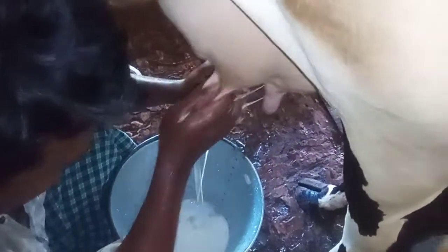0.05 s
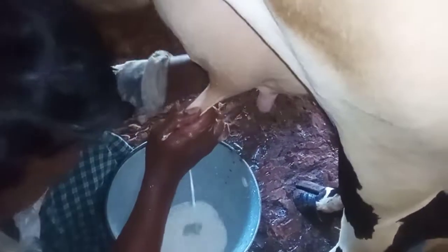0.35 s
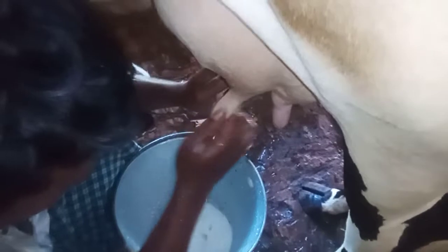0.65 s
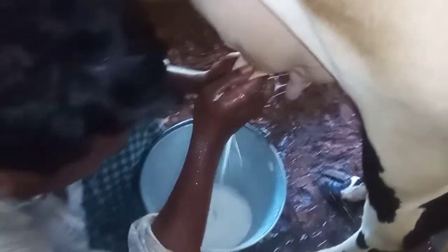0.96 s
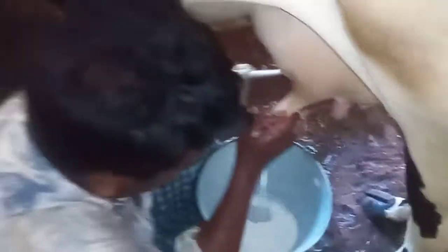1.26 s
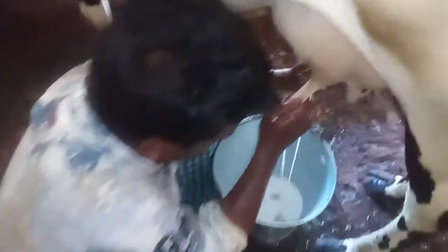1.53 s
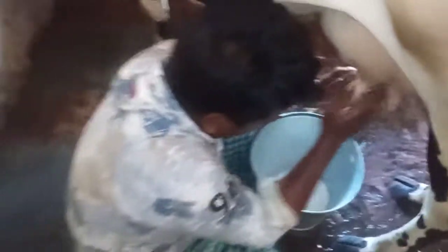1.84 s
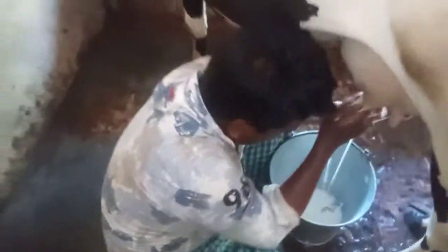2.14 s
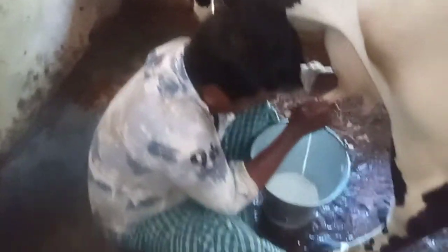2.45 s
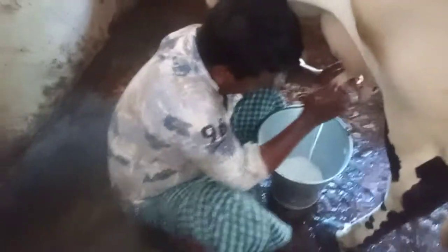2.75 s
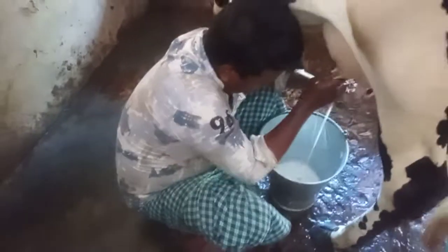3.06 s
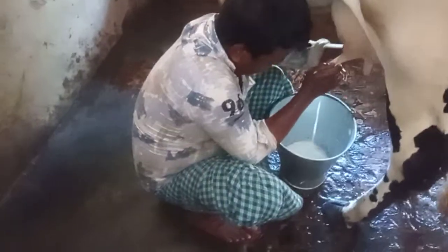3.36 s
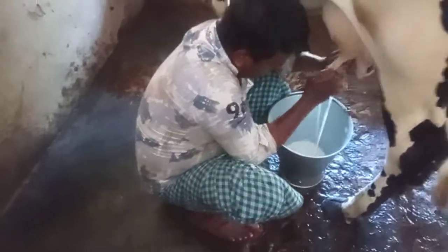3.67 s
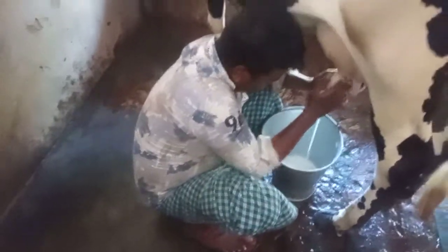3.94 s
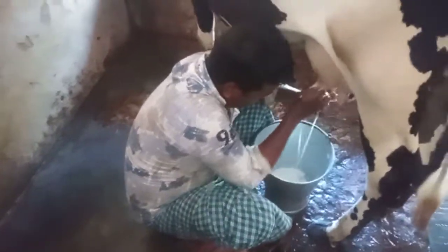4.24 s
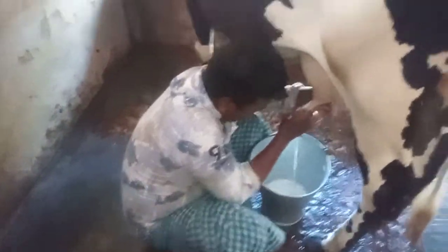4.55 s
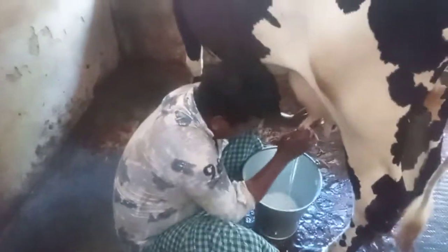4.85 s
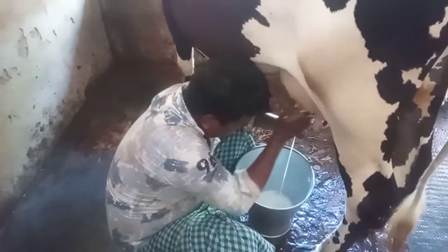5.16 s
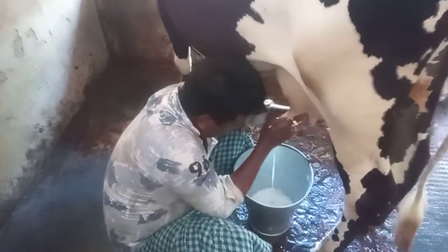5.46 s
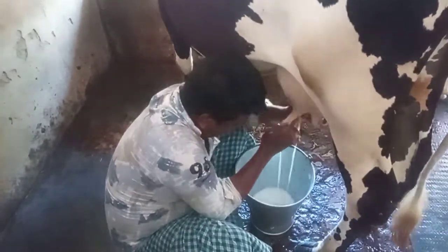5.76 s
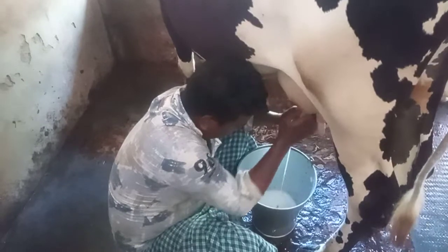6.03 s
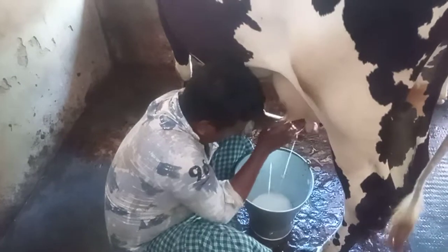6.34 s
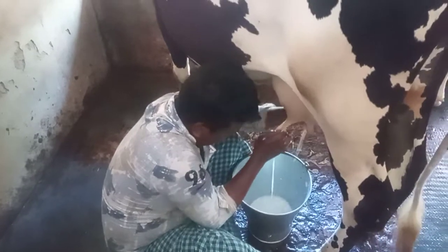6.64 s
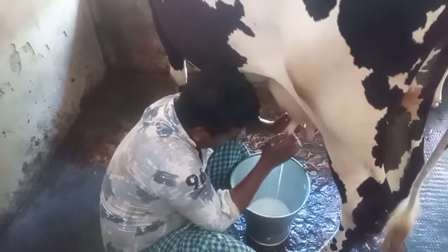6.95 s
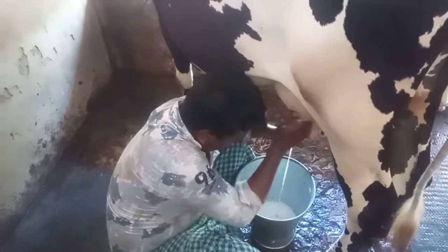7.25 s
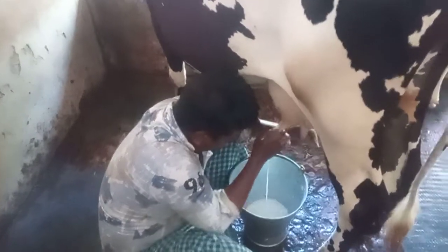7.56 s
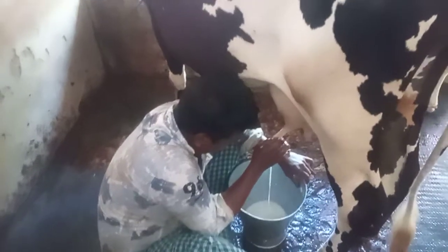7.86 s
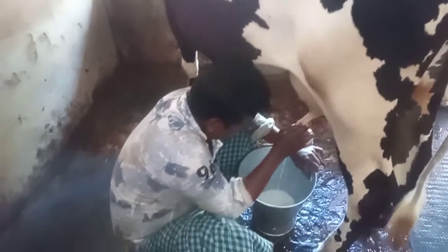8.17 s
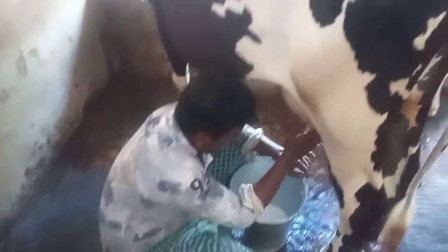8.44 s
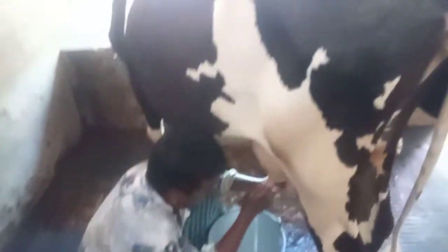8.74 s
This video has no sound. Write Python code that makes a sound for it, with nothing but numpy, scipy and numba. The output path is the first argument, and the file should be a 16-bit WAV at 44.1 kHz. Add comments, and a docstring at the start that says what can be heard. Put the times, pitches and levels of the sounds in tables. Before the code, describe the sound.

From the start, quick jets of milk squirt into a part-filled steel bucket as a cow is milked by hand, heard close in an open stall. The jets overlap, about five or six a second, each a bright, bubbly hiss with a fine spatter on the froth and a slight metallic ring. Gurgles and sharp little spurts run through them. From about 2 seconds, deeper plunges slop the milk and drum softly on the bucket, strongest around 3, 5.5 and 6.5 to 8 seconds. At about 8 seconds the jets stop and the milk settles, with a few faint spatters. Between 8.3 and 8.8 seconds come four short, thin, wavering whistles, perhaps a bird, the last possibly a fine jet of milk, with a soft knock at about 8.4 seconds. Faint yard noise and occasional dull bumps lie behind throughout.

```python
"""Jets of milk hiss and ring into a steel bucket: a cow is milked by hand in an open stall.
Two overlapping jets blow clouds of ringing bubbles, spatter on the froth and drag air under it.
Deep plunges slop the milk and drum on the bucket; its bare wall rings along.
Faint yard noise and dull bumps lie behind. When the hands pause, thin whistles waver:
perhaps a bird, the last likely a thin milk jet singing."""
import sys
import numpy as np
from scipy import signal
from scipy.fft import rfft, irfft
from scipy.io import wavfile
from scipy.ndimage import uniform_filter1d
from numba import njit

SR = 44100
rng = np.random.default_rng(int(sys.argv[2]) if len(sys.argv) > 2 else 0)


def persist_wave(psi):
    """Save psi, clipped to +-1, as 16-bit WAV."""
    counts = np.round(np.clip(psi, -1, 1) * 32767).astype(np.int16)
    wavfile.write(sys.argv[1], SR, np.atleast_2d(counts).T)


N = 388080
T = np.arange(N) / SR
T_SLOW = T[::64]  # envelope clock

# Table levels are relative within a layer.
# jet enters open milk: t/s, attack/s, hold/s, level/dB, mid-glide f/Hz, log-pitch scatter
SQUIRT_EVENTS = [(-0.042, 0.05, 0.14, -14.5, 2990, 0.08), (0.208, 0.081, 0.082, -16.5, 3400, 0.04),
                 (0.383, 0.041, 0.18, -20.5, 3410, 0.11), (0.6, 0.057, 0.15, -19.5, 3270, 0.13),
                 (0.788, 0.039, 0.051, -22, 3580.0, 0.041), (0.87, 0.068, 0.1, -20.5, 3460, 0.06),
                 (1.07, 0.089, 0.15, -19, 3420, 0.23), (1.267, 0.069, 0.12, -16.0, 3020, 0.093),
                 (1.439, 0.078, 0.095, -19.5, 3120, 0.086), (1.585, 0.092, 0.13, -19.0, 2950.0, 0.06),
                 (1.833, 0.085, 0.13, -22, 3020, 0.06), (1.952, 0.033, 0.092, -17.5, 2900, 0.04),
                 (2.09, 0.032, 0.051, -18.5, 3010, 0.05), (2.18, 0.038, 0.076, -23, 3020, 0.07),
                 (2.271, 0.018, 0.14, -19.5, 3140, 0.08), (2.47, 0.024, 0.18, -26, 3470, 0.06),
                 (2.674, 0.12, 0.045, -16, 3050, 0.12), (2.854, 0.033, 0.14, -21.5, 2980, 0.13),
                 (2.97, 0.072, 0.1, -21.5, 3410, 0.1), (3.118, 0.034, 0.108, -26, 3220, 0.08),
                 (3.218, 0.043, 0.058, -17.5, 2880, 0.12), (3.335, 0.027, 0.23, -23, 3470, 0.04),
                 (3.61, 0.048, 0.1, -24.0, 3250, 0.08), (3.722, 0.051, 0.027, -18.5, 3370, 0.09),
                 (3.834, 0.019, 0.25, -23, 2960, 0.2), (4.142, 0.039, 0.067, -19.5, 2810, 0.14),
                 (4.238, 0.029, 0.15, -28.5, 2730, 0.01), (4.345, 0.03, 0.071, -18.5, 2780, 0.06),
                 (4.486, 0.051, 0.14, -18.5, 2900, 0.086), (4.67, 0.021, 0.1, -24, 2990, 0.08),
                 (4.795, 0.1, 0.1, -18, 2900, 0.21), (4.985, 0.05, 0.018, -15, 2840.0, 0),
                 (5.083, 0.047, 0.11, -21, 2760, 0.12), (5.324, 0.093, 0.01, -17, 2680, 0.12),
                 (5.454, 0.052, 0.16, -19.0, 2950, 0.1), (5.688, 0.04, 0.072, -27, 3270, 0.14),
                 (5.827, 0.103, 0.12, -21.0, 2880, 0.09), (5.965, 0.048, 0.19, -21, 3070, 0.2),
                 (6.118, 0.11, 0.09, -18.0, 2840, 0.08), (6.324, 0.034, 0.11, -21.5, 2700, 0.052),
                 (6.847, 0.13, 0.017, -17.5, 3210, 0.15), (7.01, 0.024, 0.08, -22.5, 2910, 0.13),
                 (7.103, 0.064, 0.047, -17, 2860, 0.06), (7.242, 0.029, 0.18, -23.5, 3150, 0.12),
                 (7.475, 0.03, 0.13, -28.5, 2750, 0.1), (7.717, 0.055, 0.108, -22.0, 2770, 0.12),
                 (7.84, 0.068, 0.1, -24, 2830, 0.047)]
# jet strikes froth: t/s, attack/s, hold/s, spray level/dB, mist level/dB
SPATTER_EVENTS = [(-0.038, 0.032, 0.26, -32.5, -40), (0.253, 0.076, 0.15, -31, -42),
                  (0.442, 0.1, 0.147, -31.5, -41.5), (0.707, 0.043, 0.18, -33.5, -41.5),
                  (0.868, 0.091, 0.159, -32, -37.5), (1.047, 0.13, 0.098, -28, -37),
                  (1.243, 0.03, 0.19, -30.5, -42), (1.422, 0.066, 0.12, -33.5, -42.5),
                  (1.577, 0.074, 0.26, -32.0, -40), (1.815, 0.051, 0.238, -35.5, -40),
                  (2.11, 0.084, 0.075, -34, -41), (2.25, 0.097, 0.055, -28.5, -40),
                  (2.42, 0.044, 0.3, -30, -44), (2.763, 0.042, 0.16, -31.5, -46),
                  (2.968, 0.078, 0.18, -29.5, -45.5), (3.217, 0.1, 0.074, -28, -43.0),
                  (3.377, 0.021, 0.16, -26.5, -47.0), (3.58, 0.055, 0.17, -28, -42.5),
                  (3.766, 0.063, 0.2, -28.5, -41), (4.01, 0.06, 0.25, -31, -40.5),
                  (4.32, 0.018, 0.08, -32.0, -49.0), (4.401, 0.061, 0.11, -29, -44),
                  (4.547, 0.033, 0.214, -32.5, -51), (4.778, 0.057, 0.17, -27, -40),
                  (5.067, 0.042, 0.186, -30.0, -44.0), (5.286, 0.043, 0.143, -30, -43),
                  (5.416, 0.029, 0.23, -30.5, -46), (5.677, 0.084, 0.218, -29, -41),
                  (5.925, 0.041, 0.16, -31.5, -41), (6.108, 0.076, 0.28, -29.0, -40),
                  (6.401, 0.078, 0.055, -25.5, -40.0), (6.57, 0.048, 0.16, -26.5, -39.5),
                  (6.771, 0.1, 0.24, -27.5, -40.0), (7.046, 0.03, 0.22, -35.5, -48),
                  (7.207, 0.077, 0.31, -30.5, -40), (7.484, 0.092, 0.13, -27, -39),
                  (7.717, 0.059, 0.22, -31.5, -42.5), (8.064, 0.012, 0.22, -52.5, -62.5),
                  (8.433, 0.01, 0.034, -42.5, -77.5), (8.532, 0.024, 0.15, -55, -60),
                  (8.788, 0.003, 0.1, -36.5, -52)]
# jet drags air under: t/s, length/s, level/dB
GURGLE_EVENTS = [(-0.021, 0.246, -32), (0.433, 0.187, -31), (0.684, 0.033, -30), (1.067, 0.161, -26.5),
                 (1.215, 0.031, -18.5), (1.449, 0.064, -26), (1.633, 0.2, -29), (2.294, 0.16, -27),
                 (2.462, 0.048, -32), (2.7, 0.11, -32), (3.285, 0.158, -31.5), (4.318, 0.21, -32.5),
                 (4.477, 0.15, -30.5), (4.757, 0.13, -33.5), (5.308, 0.14, -33), (5.544, 0.062, -29.5),
                 (5.85, 0.049, -30.5), (6.134, 0.065, -37), (6.38, 0.11, -28), (7.02, 0.082, -32),
                 (7.5, 0.052, -24.5), (7.638, 0.33, -33)]
# jet plunges deep: t/s, length/s, drum level/dB, slop level/dB
PLUNGE_EVENTS = [(0.162, 0.033, -55, -44), (0.478, 0.11, -44.5, -42), (0.707, 0.044, -44, -37.5),
                 (0.976, 0.165, -43, -40.5), (1.106, 0.15, -39, -53), (1.403, 0.15, -52, -38.5),
                 (1.7, 0.091, -41.5, -39.5), (1.882, 0.03, -39.5, -42), (2.076, 0.2, -39.0, -43),
                 (2.337, 0.22, -39.5, -32.5), (2.505, 0.054, -30, -33), (2.822, 0.11, -42.5, -35),
                 (3.094, 0.12, -30, -42), (3.233, 0.101, -38, -34), (3.39, 0.091, -31.5, -30.5),
                 (3.564, 0.029, -33.5, -34), (3.937, 0.19, -44.5, -44.5), (4.083, 0.21, -42.5, -44.5),
                 (4.43, 0.024, -39, -35.5), (4.599, 0.17, -38, -34.5), (4.897, 0.086, -40, -39.5),
                 (5.184, 0.038, -38, -35), (5.255, 0.095, -29, -33), (5.66, 0.26, -30.5, -34),
                 (6.065, 0.43, -42, -44), (6.448, 0.285, -26.5, -33), (6.807, 0.048, -30, -34.0),
                 (7.017, 0.025, -28, -38), (7.239, 0.26, -34.5, -38), (7.575, 0.37, -26.0, -38.5),
                 (7.996, 0.18, -29, -41.5)]
# jet stabs the milk: t/s, peak level/dB, f/Hz
SPURT_EVENTS = [(0.2747, -4.5, 3570), (0.2834, -8, 3590), (0.2904, -7, 3320), (0.3166, -6, 3560),
                (1.971, -11, 2840), (1.982, -17, 2980), (2.0298, -5, 2980), (2.126, -10, 2920),
                (2.132, -2.5, 2960), (2.292, -8, 3030), (2.301, -3.5, 3110), (2.7377, -5, 3060),
                (2.788, -6, 2900), (3.259, -7, 3100), (3.7875, -6, 3420), (4.1688, -10, 2670),
                (4.3659, -7, 2840), (4.3966, -4, 2650), (4.476, -6.5, 2750), (4.682, -5.5, 2785),
                (4.866, -6.5, 2850), (4.9565, -7, 2780), (5.0453, -5, 2840), (5.514, -3.5, 2880),
                (5.534, -8, 2880), (5.9772, -11, 2700), (6.4114, -9, 2680), (7.157, -8, 2850),
                (7.1783, -4, 2910), (7.9083, -13, 2830)]
# jet digs a hollow: centre t/s, length/s, f/Hz, level/dB
GULP_EVENTS = [(0.44, 0.4, 2220, -29), (0.55, .043, 1540, -29.5), (0.755, 0.17, 2280, -28.5),
               (0.837, .05, 3450, -26), (.97, .09, 3490, -26), (1.273, 0.025, 1330, -20),
               (1.74, 0.065, 3030, -25), (2.412, 0.066, 1020, -31), (2.475, 0.081, 3800, -25),
               (2.542, 0.29, 4300, -27.5), (2.7, 0.12, 3060, -27), (2.905, .025, 2750, -23),
               (3.04, 0.037, 2690, -22), (3.126, .08, 3670, -23.5), (4.732, 0.054, 3050, -25),
               (4.83, 0.055, 1170, -32), (5.748, 0.043, 3340, -26)]
# bumps and shuffles: centre t/s, length/s, f/Hz, level/dB
BUMP_EVENTS = [(.55, .1, 150, -54), (1.145, 0.17, 170, -58), (1.36, 0.083, 115, -50),
               (1.53, .12, 86.5, -56), (1.54, 0.16, 170, -47.5), (1.813, .04, 151, -47),
               (1.83, .04, 75, -51), (6.16, 0.055, 130, -62), (8.094, 0.24, 140, -56),
               (8.444, 0.054, 760, -37.5), (8.45, 0.092, 1160, -40), (8.736, 0.11, 85, -59)]
# thin whistles: t/s, length/s, first f/Hz, last f/Hz, level/dB, octave level/dB
WHISTLE_NOTES = [(8.3, 0.046, 3520, 3500, -46, -25), (8.345, 0.13, 2970, 2480, -32, -9),
                 (8.53, .055, 3480, 3450, -42, -25), (8.605, 0.14, 2625, 2810, -37.5, -27)]
# modes of the part-filled bucket: f/Hz, width/Hz, level/dB
BUCKET_MODES = [(280.8, 6.6, 2.5), (320, 17.2, 0.5), (352.3, 29.3, 2), (376, 12.8, 3.5), (408.8, 5.6, 1),
                (431.7, 10.5, 1), (500.4, 7.2, -7), (574, 13, -9), (599, 19, -10.5), (703, 23, -15.5),
                (799, 21, -21), (960, 26, -22.5)]
# modes of the bare wall above the milk: f/Hz, width/Hz, level/dB
WALL_MODES = [(930, 12, -5), (1275, 16, -6), (1570, 10, -18.5), (2130, 13, -39), (2450, 25, -8),
              (2880, 59, -16.5), (3190, 42, -36), (3400, 21, -15), (3560, 62, -5), (4460, 87, -21),
              (4580, 28, -2.5), (5280, 30, -36), (6500, 37, -30)]
# EQ of drops on froth: f/Hz, level/dB
SPRAY_EQ = [(400, -40), (1000, -18), (1900, -10.5), (2200, 3), (3000, 2.5), (4200, 3.5), (5000, 2),
            (6700, 1), (7400, -6.5), (8100, -18), (10500, -22.5), (14000, -40)]
# fine droplet hiss, with the microphone's resonance near 15 kHz: f/Hz, level/dB
MIST_MIC_EQ = [(6000, -35), (8200, -1.5), (10300, -2), (12000, -6.5), (13700, -4.5), (14700, 4.5),
               (15300, 10), (15800, -5)]
# EQ of slopping milk: f/Hz, level/dB
SLOP_EQ = [(60, -36), (150, -20), (230, -24), (300, 8.5), (480, 0), (530, 0), (590, 5.5), (760, 7.5),
           (835, -2), (950, 8), (1300, -1.5), (2500, -22)]
# EQ of yard noise: f/Hz, level/dB
YARD_EQ = [(25, -25), (70, -7.5), (130, -2), (330, 12), (600, -0.5), (1300, 3), (2700, 12), (4500, -4),
           (6500, 2), (8200, -35.5), (13000, -35), (15500, -32)]

PAUSE_S, SETTLE_S = 7.97, 0.14  # hands stop, milk settles


def undb(db):
    """dB to gain."""
    return 10 ** (np.asarray(db) / 20)


def colour(x, eq):
    """Filter by (f/Hz, level/dB) points, interpolated over log f."""
    hz, db = np.transpose(eq)
    bins_hz = np.maximum(np.fft.rfftfreq(N, 1 / SR), 1)
    return irfft(rfft(x) * undb(np.interp(np.log(bins_hz), np.log(hz), db)), N)


def resonate(x, modes):
    """Ring (f/Hz, width/Hz, level/dB) modes; neighbours in opposite polarity."""
    return sum((-1) ** k * undb(db) * signal.lfilter(*signal.iirpeak(hz, hz / width_hz, SR), x)
               for k, (hz, width_hz, db) in enumerate(modes))


def steady(x, samples=2200):
    """Hold running RMS at 1; quick grain stays."""
    power = uniform_filter1d(uniform_filter1d(x * x, samples), samples)
    return x / np.sqrt(np.abs(power) + 1e-18)


def drops(per_s, spread_db):
    """Random impacts; a few stand out by multiples of spread_db."""
    size = undb(spread_db * np.minimum(rng.exponential(size=N), 5))
    return (rng.random(N) < per_s / SR) * size * rng.choice([-1, 1], N)


def flutter(rate_hz):
    """Random wobble, unit deviation."""
    wobble = np.interp(T * rate_hz, np.arange(N), rng.standard_normal(N))
    return wobble / wobble.std()


def swell(centre_s, length_s):
    """Gaussian hump."""
    return np.exp(-2 * ((T - centre_s) / length_s) ** 2)


def envelope(start_s, length_s, attack_s, release_s, slope_db_per_s=0):
    """Linear attack, sloping hold, exponential release, on T_SLOW."""
    age_s = T_SLOW - start_s
    attack = np.clip(age_s / attack_s, 0, 1)
    hold = undb(slope_db_per_s * np.clip(age_s, 0, length_s))
    return attack * hold * np.exp(-np.maximum(age_s - length_s, 0) / release_s)


def overlap(shapes, db):
    """Power sum of envelopes, as an audio-rate gain."""
    return np.interp(T, T_SLOW, np.sqrt(undb(db) ** 2 @ np.square(shapes) + 1e-12))


def echoes(x, t60_s, wet_db, wander_hz, count=7):
    """Add dense reflections whose pattern shifts as the source wanders."""
    t = T[:SR // 6]
    tails = rng.standard_normal((count, len(t))) * np.exp(-np.log(1000) * t / t60_s)
    tails /= np.linalg.norm(tails, axis=1, keepdims=True)
    weights = np.array([np.exp(2 * flutter(wander_hz)) for _ in range(count)])
    weights /= np.linalg.norm(weights, axis=0)
    return x + undb(wet_db) * sum(w * signal.fftconvolve(x, tail)[:N] for w, tail in zip(weights, tails))


@njit
def bubbles(kicks, hz, cycles, rise):
    """Each kick rings a bubble: down 60 dB over `cycles`, pitch up by the fraction `rise`."""
    out = np.zeros(len(kicks))
    for i in np.nonzero(kicks)[0]:
        life, phase = cycles * SR / hz[i], 0.
        for j in range(min(int(life), len(kicks) - i)):
            phase += 2 * np.pi * hz[i] / SR * (1 + rise * j / life)
            out[i + j] += kicks[i] * np.exp(-6.9 * j / life) * np.sin(phase)
    return out


def fine_bubbles(centre_hz, scatter):
    """A still jet blows bubbles of one size, a spattering jet all sizes."""
    hz = centre_hz * np.exp(np.clip(scatter * rng.laplace(size=N), -0.7, 0.7))
    kicks = drops(per_s=3500, spread_db=2.5) * undb(0.82 * flutter(150))
    cloud = echoes(bubbles(kicks, hz, cycles=44.4, rise=0.018), t60_s=0.14, wet_db=0, wander_hz=5)
    eq = [(500, -41), (1900, -5.5), (2250, 2), (4200, 5.5), (7000, -17), (12000, -32)]
    return steady(colour(cloud, eq))


def squirts(rise_hz_per_s=180):
    """Jets ring the milk in turn: level sags, pitch creeps up, the loudest dominates bubble size."""
    start_s, attack_s, hold_s, db, mid_hz, scatter = np.transpose(SQUIRT_EVENTS)
    length_s = attack_s + hold_s
    shapes = np.array([envelope(*timing, release_s=0.044, slope_db_per_s=-19)
                       for timing in zip(start_s, length_s, attack_s)])
    glides_hz = [hz + rise_hz_per_s * (np.clip(T_SLOW - at_s, 0, span_s) - span_s / 2)
                 for at_s, span_s, hz in zip(start_s, length_s, mid_hz)]
    share = (undb(db)[:, None] * shapes) ** 2 + 1e-18
    share /= share.sum(axis=0)
    centre_hz = np.interp(T, T_SLOW, (share * glides_hz).sum(axis=0))
    cloud = fine_bubbles(centre_hz, np.interp(T, T_SLOW, scatter @ share))
    return overlap(shapes, db - 0.05) * undb(1.4 * flutter(30)) * cloud


def shower(hits, t60_s, wet_db):
    """Each impact throws up a dying shower of finer droplets."""
    pole = np.exp(-np.log(1e6) / (t60_s * SR))
    energy = signal.lfilter([1 - pole], [1, -pole], hits ** 2 + 1e-18)
    return hits + undb(wet_db) * np.sqrt(energy) * rng.standard_normal(N)


def spray(mist_gain):
    """Drops patter on the froth; the finest fizz on top."""
    hits = drops(per_s=2400, spread_db=2.5) * undb(flutter(110))
    patter = shower(hits, t60_s=0.28, wet_db=1)
    patter = echoes(patter, t60_s=0.06, wet_db=-4, wander_hz=6, count=12)
    fizz = shower(drops(per_s=1400, spread_db=2.5), t60_s=0.096, wet_db=6)
    fizz = echoes(fizz, t60_s=0.051, wet_db=-15, wander_hz=5, count=4)
    return undb(5) * steady(colour(patter, SPRAY_EQ)) + mist_gain * steady(colour(fizz, MIST_MIC_EQ))


def spatters(slugs_per_s=25, slug_decay_s=0.033, slug_db=2.14):
    """Spray and mist swell with each jet on the froth and jump with the slugs in it."""
    start_s, attack_s, hold_s, spray_db, mist_db = np.transpose(SPATTER_EVENTS)
    shapes = [envelope(*timing, release_s=0.07) for timing in zip(start_s, attack_s + hold_s, attack_s)]
    gain = overlap(shapes, spray_db - 0.98)
    mist_ratio = overlap(shapes, mist_db - 0.8) / gain
    arrivals = rng.random(N) < slugs_per_s / SR
    slugs = signal.lfilter([1], [1, -np.exp(-1 / (slug_decay_s * SR))], arrivals)
    jumps = undb(slug_db * (slugs - slugs.mean()))
    return gain * jumps * spray(mist_ratio * undb(0.45 * flutter(30)))


def agitation(events, db, attack_s, release_s, floor_db):
    """Gain of events (t/s, length/s, ...) over a floor of stirred milk that settles at the pause."""
    shapes = [envelope(start_s, length_s, attack_s, release_s) for start_s, length_s, *_ in events]
    stirred = np.exp(-np.maximum(T - PAUSE_S, 0) / SETTLE_S)
    return np.hypot(overlap(shapes, db), stirred * undb(floor_db))


def gurgles():
    """Air dragged under the froth rings as coarse bubbles."""
    *_, db = np.transpose(GURGLE_EVENTS)
    gain = agitation(GURGLE_EVENTS, db, attack_s=0.026, release_s=0.1, floor_db=-36)
    gain *= undb(-1.4 + 0.36 * flutter(25))
    hz = 1550 * np.exp(0.317 * np.clip(rng.standard_normal(N), -3, 3))
    cloud = bubbles(drops(per_s=2200, spread_db=3.5), hz, cycles=26.0, rise=0.065)
    cloud = echoes(cloud, t60_s=0.21, wet_db=-0.5, wander_hz=4)
    eq = [(300, -32), (800, -10), (1050, -3.5), (1450, 3), (2200, 11.5), (4000, -5)]
    return gain * steady(colour(cloud, eq))


def yard():
    """Faint, wavering outdoor noise."""
    return steady(colour(rng.standard_normal(N), YARD_EQ)) * undb(-44 + flutter(9))


def wall_ring(x):
    """The bare steel wall rings along with x, all modes in phase."""
    return sum(resonate(x, [mode]) for mode in WALL_MODES)


def bucket_drum():
    """Deep jets beat the low modes of the bucket."""
    *_, db, _ = np.transpose(PLUNGE_EVENTS)
    gain = agitation(PLUNGE_EVENTS, db, attack_s=0.019, release_s=0.097, floor_db=-45.5)
    gain *= undb(0.6 + 1.15 * flutter(28))
    return gain * steady(resonate(drops(per_s=900, spread_db=3), BUCKET_MODES), samples=3000)


def slop():
    """Deep jets throw the milk about."""
    *_, db = np.transpose(PLUNGE_EVENTS)
    gain = agitation(PLUNGE_EVENTS, db, attack_s=0.019, release_s=0.15, floor_db=-70)
    gain *= undb(-2 + 1.6 * flutter(28))
    return gain * steady(colour(drops(per_s=1800, spread_db=1.5), SLOP_EQ))


def spurts(rise_s=0.0021, detune=0.0043):
    """A jet stabs the milk; a knot of like bubbles swells and rings away."""
    out, t = np.zeros(N), T[:1500]
    shape = t / rise_s * np.exp(1 - t / rise_s)
    for start_s, db, hz in SPURT_EVENTS:
        hz *= 1 + detune * rng.standard_normal()
        ring = np.sin(2 * np.pi * hz * t + np.pi * rng.standard_normal())
        start = int(start_s * SR)
        out[start:start + len(t)] += undb(db - 6.5) * shape * ring
    return out


def gulps():
    """A still jet digs a hollow that sings: bubbles of nearly one size."""
    out = 0
    for centre_s, length_s, hz, db in GULP_EVENTS:
        cluster = resonate(drops(per_s=1000, spread_db=-4.5), [(hz, 230, 0)])
        out += undb(db) * swell(centre_s, length_s) * steady(resonate(cluster, [(hz, 600, 0)]))
    return out


def bumps():
    """Soft, heavily damped knocks: humps of band-passed noise."""
    noise, out = rng.standard_normal(N), 0
    for centre_s, length_s, hz, db in BUMP_EVENTS:
        body = [(hz, 0.6 * hz, 0)]
        out += undb(db) * swell(centre_s, length_s) * steady(resonate(resonate(noise, body), body))
    return out


def whistles():
    """Wavering glides with an octave and stall echo: perhaps a bird, the last likely a thin jet."""
    out = 0
    for start_s, length_s, first_hz, last_hz, db, octave_db in WHISTLE_NOTES:
        progress = np.clip((T - start_s) / length_s, 0, 1)
        hz = first_hz + (last_hz - first_hz) * progress
        phase = 2 * np.pi * np.cumsum(hz * (1 + 0.02 * flutter(300))) / SR
        gain = np.sin(np.pi * progress) * undb(db + 1.8 * flutter(110))
        out += gain * (np.sin(phase) + undb(octave_db) * np.sin(2 * phase))
    return echoes(out, t60_s=0.3, wet_db=-4, wander_hz=1, count=2)


def scene():
    """Yard and milk excite the wall; bumps and whistles bypass it. Dual mono."""
    near = yard() + squirts() + spatters() + gurgles() + slop() + bucket_drum() + spurts() + gulps()
    return np.tile(near + wall_ring(near) + bumps() + whistles(), (2, 1))


def record(dry, knee=0.62, top_hz=15750):
    """Soft-clip the peaks, then low-pass steeply."""
    rounded = dry / (1 + (dry / knee) ** 4) ** 0.25
    return signal.sosfilt(signal.ellip(10, 0.2, 80, top_hz, fs=SR, output="sos"), rounded)


dry = scene()
out = record(dry)
persist_wave(out)
```